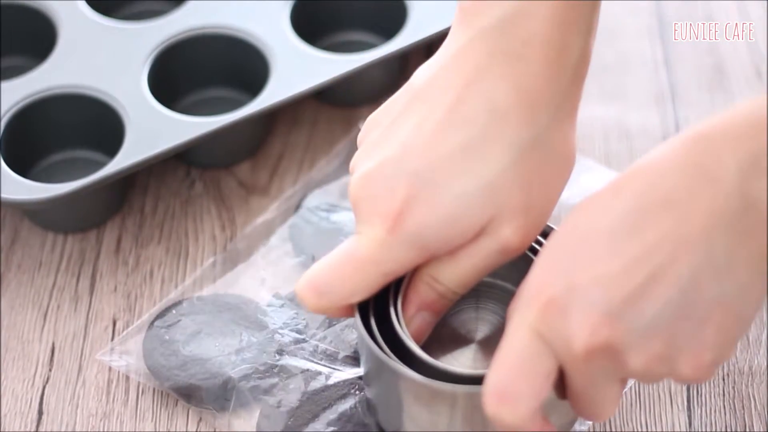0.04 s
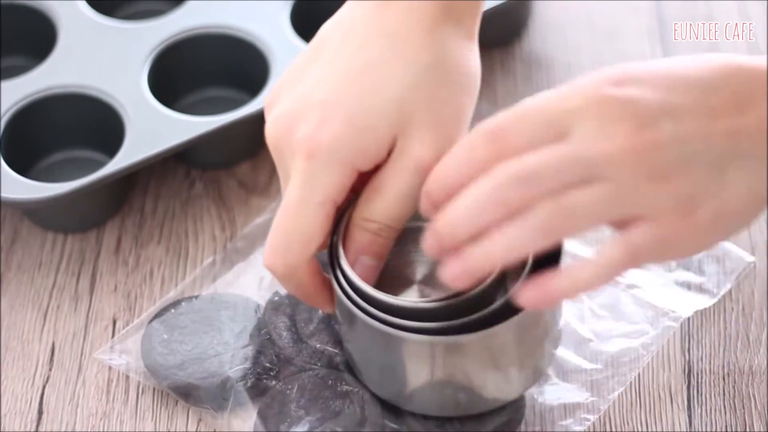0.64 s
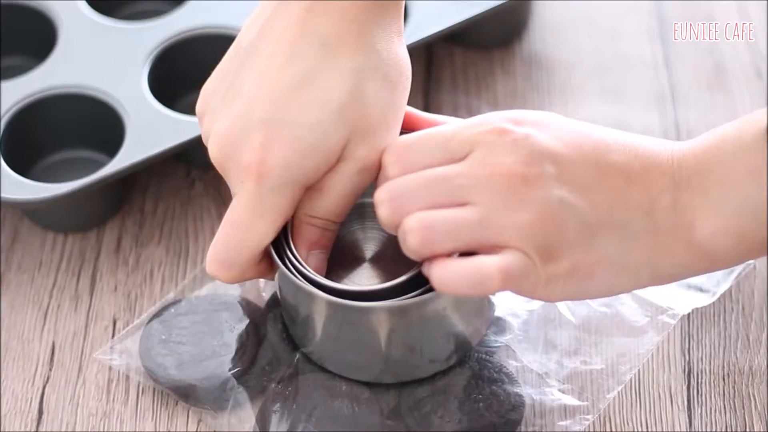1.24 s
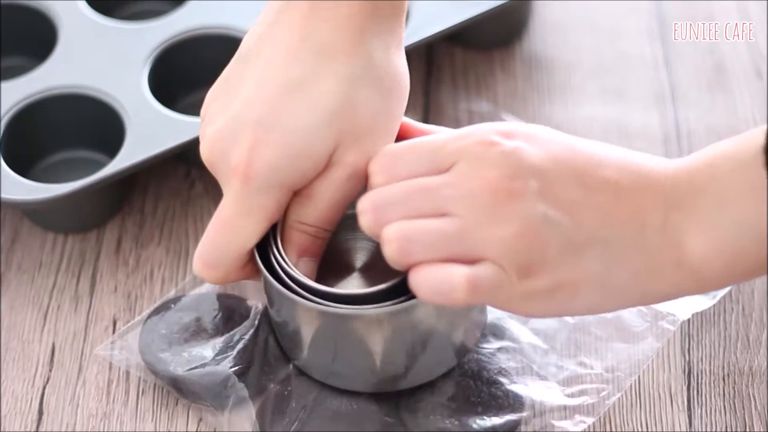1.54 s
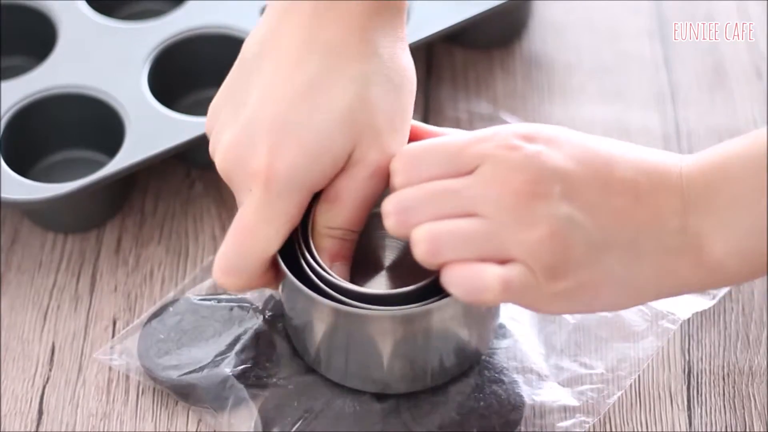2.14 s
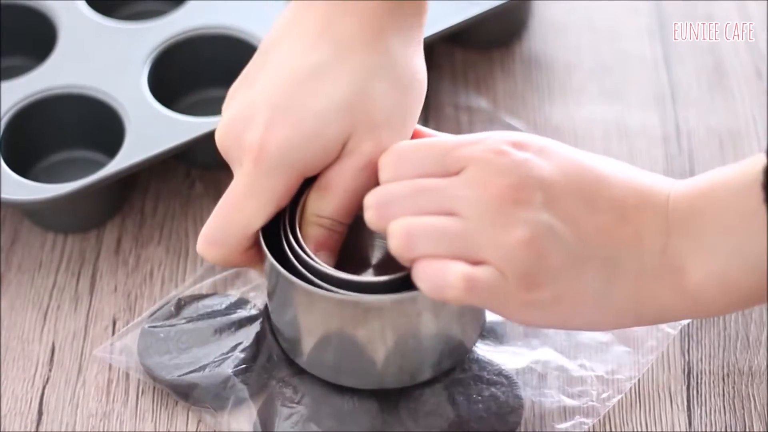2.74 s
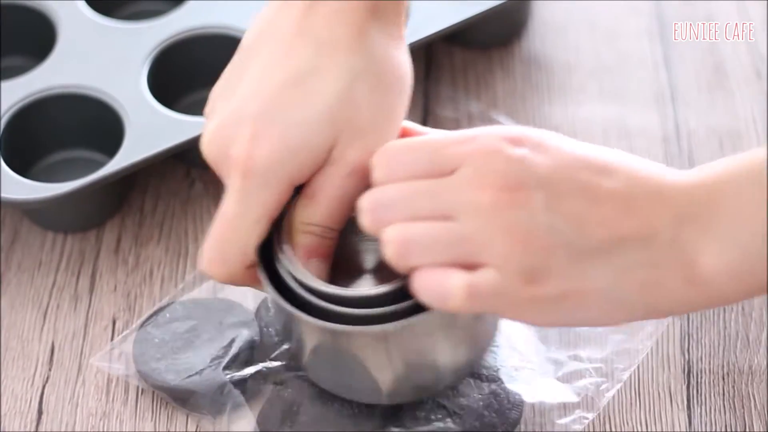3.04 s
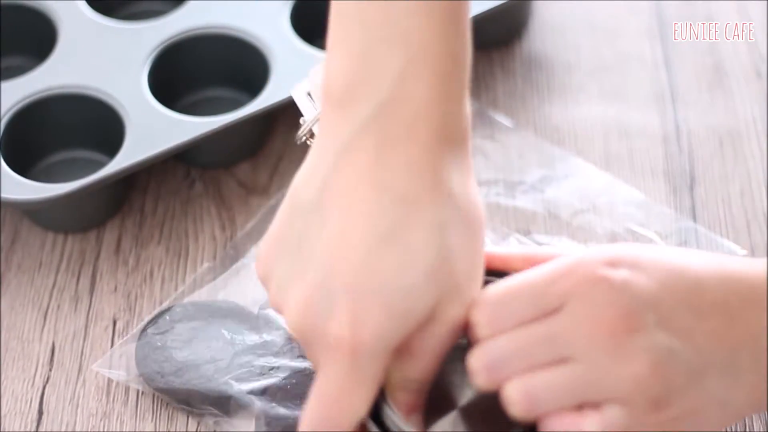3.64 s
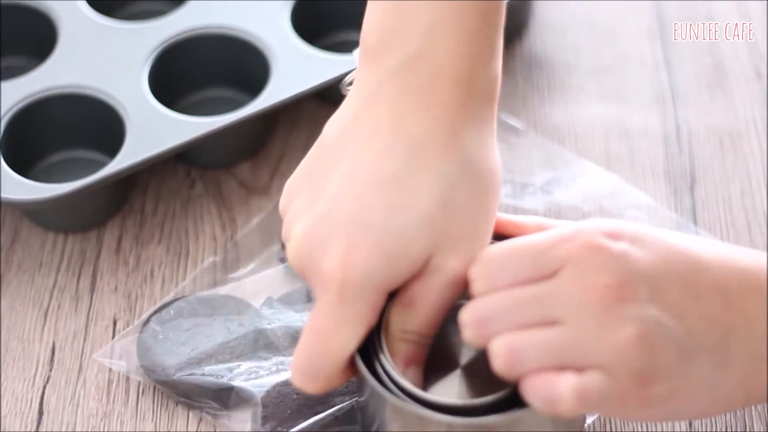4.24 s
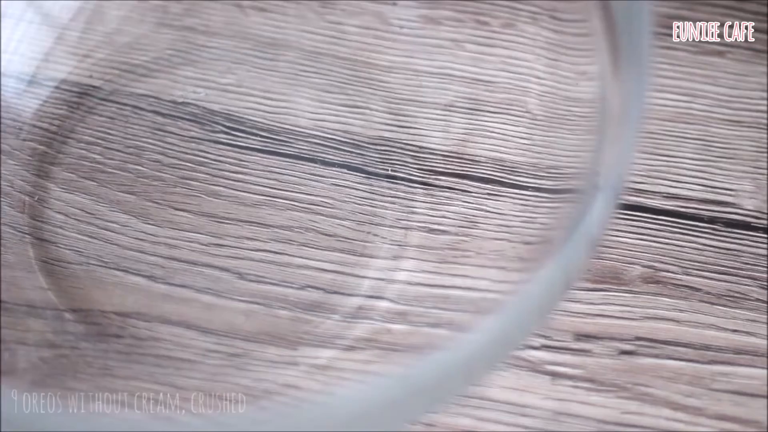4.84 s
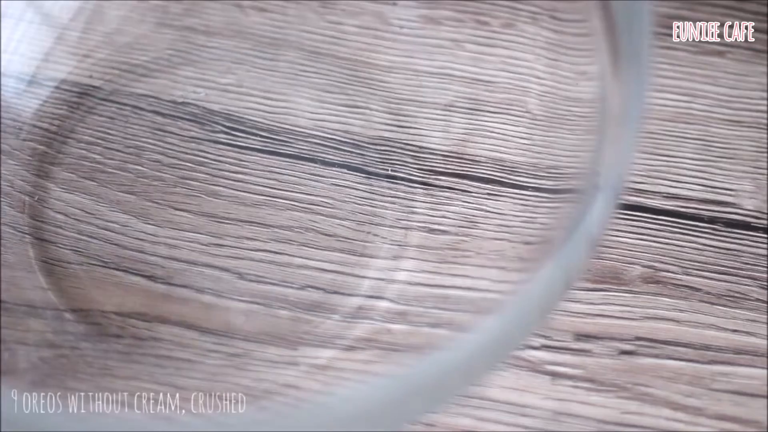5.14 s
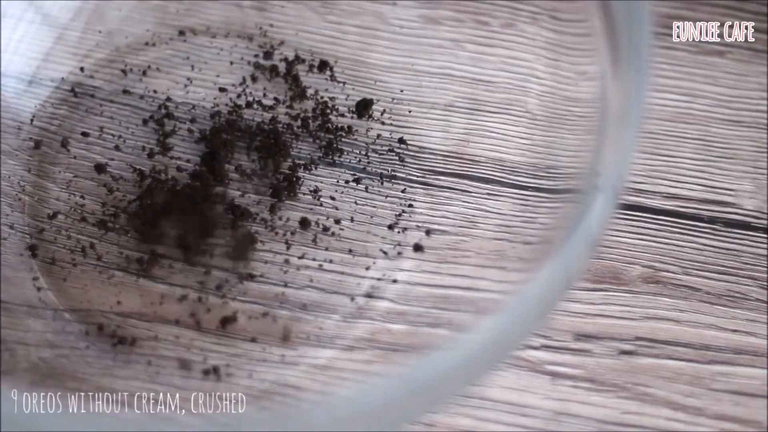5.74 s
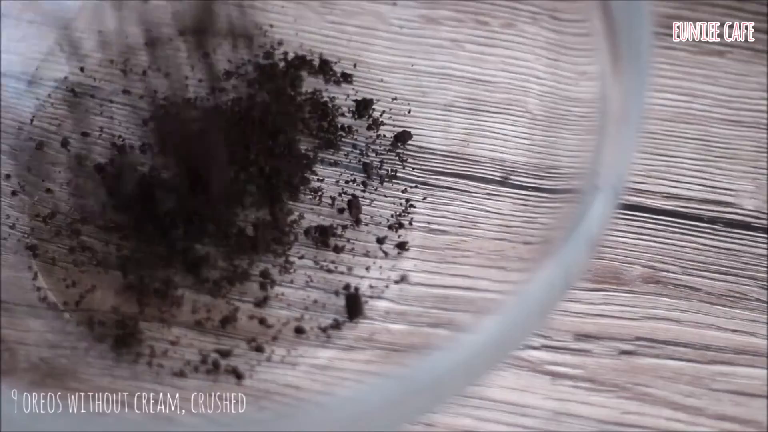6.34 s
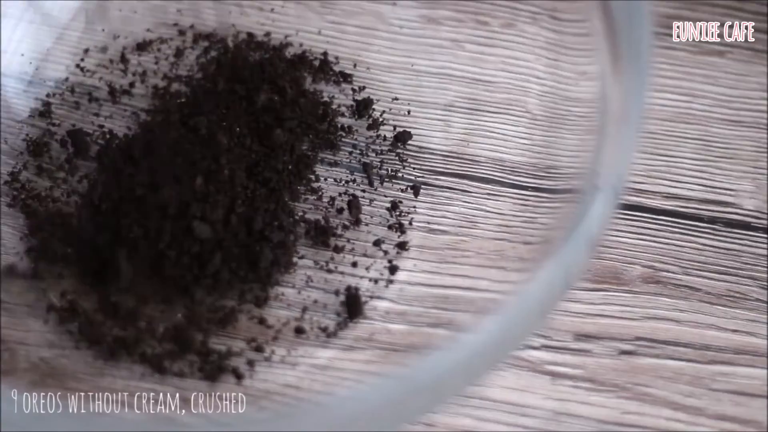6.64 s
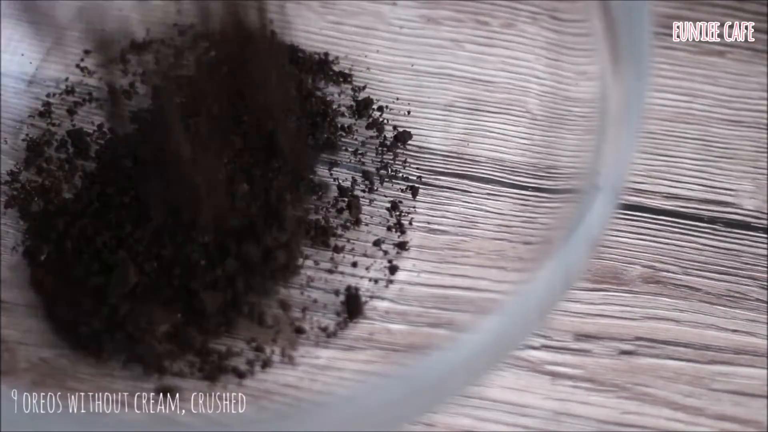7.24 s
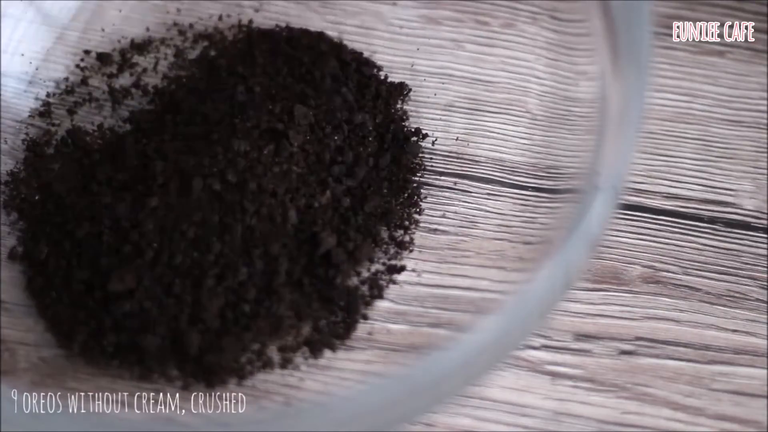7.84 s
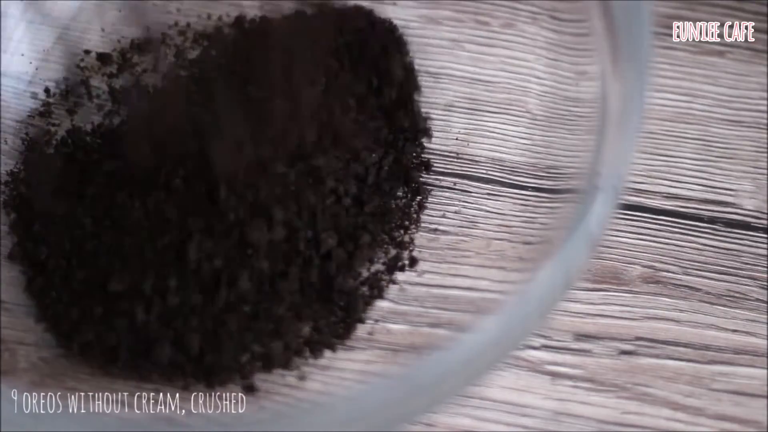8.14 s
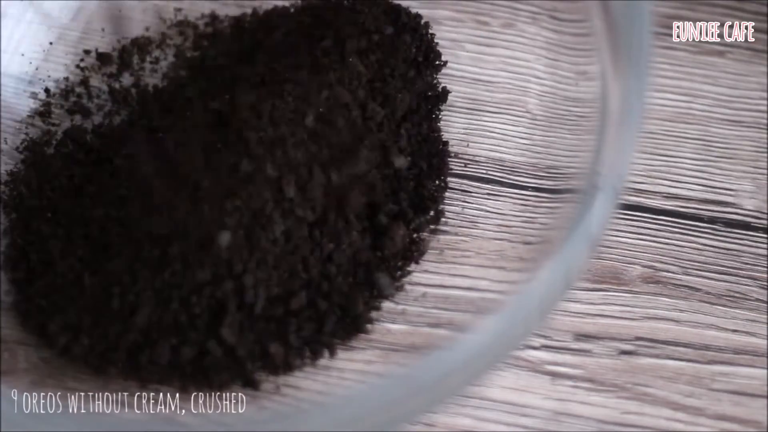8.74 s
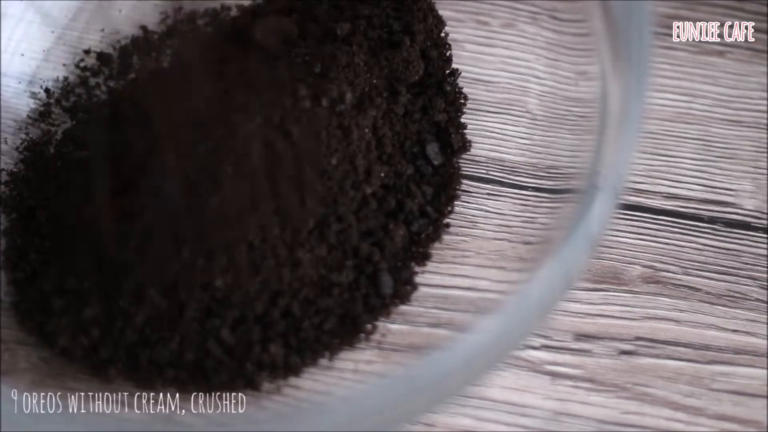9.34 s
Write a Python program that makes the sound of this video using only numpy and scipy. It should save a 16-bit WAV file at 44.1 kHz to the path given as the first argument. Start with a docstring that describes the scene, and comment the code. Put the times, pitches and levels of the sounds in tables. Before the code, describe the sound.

Close up in a quiet kitchen, cookies snap and crunch inside a faintly rustling plastic bag as stacked metal cups bear down, clinking and bumping on a wooden table. The strongest crunches and a loud clank come about halfway. An abrupt change brings a quieter sound: dry crumbs slide from a dish and tinkle into a glass bowl, dulling to a soft patter as they pile up over a faint, low room noise.

```python
"""Crushing cookies and pouring the crumbs

Nested steel cups press on cookies in a plastic bag on a wooden table: the cookies fail by brittle
fracture, the table thuds, the cups rattle and scrape. After an abrupt change of scene, crumbs slide
out of a dish and patter into a glass bowl, whose ring dies as the heap grows. A kitchen murmurs behind."""
import sys
import numpy as np
from scipy import signal
from scipy.fft import rfft, irfft
from scipy.io import wavfile
from scipy.ndimage import uniform_filter1d

SR = 44100
rng = np.random.default_rng(int(sys.argv[2]) if len(sys.argv) > 2 else 0)


def store_pcm(level_fs):
    """Save levels as 16-bit WAV."""
    pcm = np.round(np.clip(level_fs, -1, 1) * 32767).astype(np.int16)
    wavfile.write(sys.argv[1], SR, np.atleast_2d(pcm).T)


N = 422478
TIME = np.arange(N) / SR
AGE = TIME[:SR // 3]  # seconds since an impact

# Cookies breaking. Each row: start in seconds, snap level in dB, table thud in dB,
# brightness in dB per octave, ring of the piece in Hz.
SNAPS = [(0.0562, -45.5, -62, -3, 880), (1.0986, -45, -42.5, -1, 2370), (1.1978, -51.5, -70, 3.5, 3550),
         (1.324, -48, -50, -1, 1600), (1.346, -37, -43.5, -0.5, 1385), (1.5643, -53, -42.5, 6, 3850),
         (1.5912, -40, -25, -1.5, 2350), (1.607, -38, -53, 1, 2260), (1.6352, -38, -36, -1.5, 796),
         (1.653, -37, -28.5, -7, 780), (1.82, -49.5, -50, 3, 3000), (1.832, -44.5, -58, 0, 2620),
         (2.0122, -43.5, -39.5, -3, 3400), (2.3666, -37.5, -29.5, -5, 3300), (2.399, -31.5, -28, -1, 2270),
         (2.654, -50.5, -38.5, -2, 2260), (2.724, -36.5, -31, -1.5, 2400), (2.8951, -43.5, -58, -4.5, 1424),
         (3.005, -46.5, -45, -1, 3190), (3.3299, -46, -34, -4, 1190), (3.5345, -35, -29.5, -1.5, 2400),
         (3.602, -37.5, -53, -2.5, 2400), (3.61, -38.5, -31.5, 1, 2500), (3.73, -37, -43.5, -2.5, 1500),
         (4.1174, -27, -27.5, -0.5, 2460), (4.157, -35, -37, -5, 1400), (4.2019, -28.5, -33, 0, 2400),
         (4.263, -42, -52, 0.5, 2400)]
# The hands bearing down. Each row: start in seconds, length in seconds, effort in dB.
SQUEEZES = [(0.01, 0.012, -56), (1.0, 0.12, -56), (1.58, 0.012, -47), (2.005, 0.018, -55.5),
            (2.38, 0.042, -42), (2.46, 0.053, -51.5), (2.69, 0.024, -43), (2.83, 0.1, -58),
            (2.99, 0.11, -53), (3.39, 0.049, -54), (3.55, 0.12, -53), (3.755, 0.052, -47),
            (4.04, 0.14, -55.5), (4.145, 0.058, -42), (4.28, 0.066, -58)]
# Faint, short crackles of cookie or bag. Each row: start in seconds, level in dB.
SMALL_CRACKLES = [(0.169, -57), (1.068, -56), (2.77, -57), (3.641, -58), (3.762, -48), (4.058, -53.5)]
# Cups colliding. Each row: start in seconds, level in dB, brightness in dB per octave, favoured Hz.
CUP_KNOCKS = [(0.017, -49, 1, 2400), (0.262, -58, 5.5, 3900), (0.359, -49.5, 1.5, 1600),
              (0.467, -36.5, 2, 1780), (0.494, -34.5, 1, 1530), (0.528, -43.5, 3.5, 1570),
              (0.587, -34.5, 3, 1590), (0.642, -37, 3.5, 1680), (0.679, -41, 0.5, 1490),
              (0.789, -41, 1, 1500), (0.807, -34.5, 2, 1720), (0.967, -47.5, 5, 1520),
              (1.274, -46, 4.5, 3120), (1.687, -43.5, 4, 1980), (1.869, -44.5, 2, 3900),
              (1.902, -48.5, 4.5, 1500), (2.244, -53, -1, 1500), (2.511, -40, 0, 1410),
              (3.065, -41, 5.5, 1500), (3.091, -40.5, 4, 1500), (3.246, -53.5, 5.5, 1500),
              (3.333, -33, -9, 1100), (3.343, -40.5, 7.5, 2380), (3.42, -45.5, 9.5, 2240),
              (3.5, -46, 3.5, 2160), (3.986, -44.5, 5, 2610), (4.2012, -36, 1, 2800),
              (4.585, -37.5, 1.5, 2350), (4.594, -38, 10.5, 1590), (4.619, -23.5, -3, 1560)]
# A rim ringing freely. Each row: start in seconds, level in dB.
RIM_CLINKS = [(2.047, -42.5), (3.887, -39)]
# Steel rubbing on steel. Each row: start in seconds, length in seconds, level in dB.
CUP_SCRAPES = [(0.385, 0.06, -57), (0.445, 0.065, -51), (0.598, 0.038, -43.5), (0.94, 0.14, -57.5),
               (3.39, 0.045, -55), (3.79, 0.026, -46.5), (4.555, 0.03, -62), (4.593, 0.003, -36),
               (4.621, 0.024, -33)]
# The cups set down or rocked on the cookies. Each row: start in seconds, table thud in dB.
TABLE_BUMPS = [(0.422, -46), (0.615, -40.5), (0.864, -46), (1.387, -47.5)]
# Crumbs trickling from the tipped dish. Each row: start in seconds, length in seconds, flow in dB.
POURS = [(5.48, 0.62, -69.5), (6.26, 0.36, -61.5), (6.72, 0.8, -72.5), (7.31, 0.27, -60.5),
         (8.02, 0.52, -68), (8.68, 0.51, -72), (9.37, 0.05, -72.5)]
# Clumps falling apart as they land. Each row: start in seconds, patter in dB, thud in dB.
CLUMPS = [(5.607, -51.5, -61), (5.802, -55.5, -61), (6.435, -56, -59), (6.794, -60.5, -75),
          (7.344, -52, -58), (7.52, -58, -55.5), (8.034, -53, -56.5), (8.195, -53.5, -53.5),
          (8.36, -60, -67), (8.634, -57, -68), (8.7, -57, -61), (9.017, -53.5, -56.5)]
# Larger crumbs hitting glass. Each row: start in seconds, ring in dB, tick in dB.
GLASS_HITS = [(5.4435, -40, -57), (5.4815, -69, -54.5), (5.6007, -40.5, -48), (5.6181, -36, -50),
              (5.7535, -45.5, -52), (5.7753, -44.5, -48.5), (5.8217, -31, -45.5), (5.8815, -46.5, -53.5),
              (5.916, -50, -55), (6.117, -47, -55), (6.2527, -35, -55.5), (6.3235, -40, -49),
              (6.4444, -47, -44), (6.6054, -46.5, -52), (7.3028, -51, -58), (7.3544, -49, -56),
              (7.5183, -47, -60)]
# Larger crumbs hitting the heap. Each row: start in seconds, level in dB.
HEAP_HITS = [(6.838, -60.5), (6.951, -56), (9.1833, -47.5)]
# Envelope of the crumbs sliding in the dish. Each row: time in seconds, level in dB.
SLIDE_LEVELS = [(4.75, -87), (5.4, -78.5), (6.5, -76), (7.75, -75), (7.95, -67.5), (9.58, -70)]
# Normal modes. Each row: frequency in Hz, relative level in dB, time to decay by 60 dB in seconds.
CUP_MODES = [(822, -5.5, 0.093), (1100, -7.5, 0.058), (1500, 1, 0.04), (1560, -9.5, 0.032),
             (1740, -8, 0.025), (1980, -8.5, 0.031), (2400, -3, 0.039), (2834, -6.5, 0.029),
             (3154, -10, 0.035), (3330, -12, 0.035), (3923, -14, 0.061), (4500, -17.5, 0.079),
             (5190, -21, 0.05), (5900, -20.5, 0.034), (8020, -28, 0.063)]
RIM_MODES = [(2270, -10, 0.055), (3870, -18.5, 0.092), (4570, -7.5, 0.061), (7240, -12.5, 0.098),
             (10700, -17.5, 0.055)]
BOWL_BASE_MODES = [(3447, -0.71, 0.037), (3520, 0.86, 0.062)]
BOWL_WALL_MODES = [(5965, 10, 0.015), (8205, 1, 0.08), (9300, 2, 0.031), (9350, 3.5, 0.083),
                   (10360, -2, 0.066), (11560, -4.5, 0.031), (15300, 3, 0.036)]
BOWL_LIP_MODES = [(8700, -8.5, 0.059), (10070, -1, 0.043), (11100, -10, 0.045), (11700, -4.5, .04),
                  (12800, -6, 0.05), (13700, -1, 0.037), (15200, -5, .03)]
DISH_MODES = [(2426, -4.5, 0.04), (4266, 1, 0.046), (3740, -4.5, 0.019), (14260, -13, 0.016)]
# Spectral envelopes. Each row: frequency in Hz, relative level in dB.
CRACK_SPECTRUM = [(40, -50.5), (200, -18), (700, -18), (1100, -1.5), (1450, 8), (1850, -6.5), (2400, 6),
                  (2750, -4), (3800, 3.5), (4700, -8.5), (8000, -12.5), (15500, -21.5)]
BAG_SPECTRUM = [(500, -2.5), (2200, -1), (4000, -3), (7600, -11), (12000, -12), (15500, -14)]
WOOD_SPECTRUM = [(40, -47.5), (80, -14.5), (125, 3), (190, 0), (260, 2), (450, -0.5), (530, -0.5),
                 (620, -9), (800, -4), (920, -13), (1040, -8.5), (1800, -29), (5000, -40)]
HEAP_SPECTRUM = [(300, -1), (1500, -19), (3000, 3), (5000, -5.5), (9000, -2), (15500, -4.5)]
KITCHEN_SPECTRUM = [(20, -50), (45, -25.5), (161, -11.5), (236, -7), (344, -17.5), (545, -24), (1370, -39),
                    (5430, -45), (16000, -51.5)]


def cookies_in_bag(crunch, handling_db=-68.5):
    """Brittle fracture: cascades of cracks ring the pieces and cups; crumbs grind and the bag crinkles."""
    crack = colour(CRACK_SPECTRUM)
    grinding = grains(750, 1.7) * crunch
    out = undb(-6.5) * shower(grinding, chip, count=14)
    out += undb(-12.5) * shower(grinding, lambda: ring(CUP_MODES, detune=0.025))
    # the light hold between presses keeps the bag rustling
    crinkles = grains(420, 1.9) * waver(14, db=3.5) * np.hypot(crunch, undb(handling_db))
    out += undb(-9.5) * shower(crinkles, lambda: flake(BAG_SPECTRUM), count=10)
    for s, snap_db, _, tilt_db, hz in SNAPS:
        cracks = cascade(0.005, follow_db=21)
        piece = undb(-3.5) * shard(hz, cycles=9.7)
        steel = undb(-14) * ring(CUP_MODES, scatter_db=7, detune=0.021)
        snap = through(cracks, crack) + through(cracks, piece + steel)
        add(out, s, burst(tilted(snap, tilt_db), snap_db))
    for s, db in SMALL_CRACKLES:
        add(out, s, burst(through(cascade(0.004, follow_db=14), flake(BAG_SPECTRUM)), db))
    return out


def shard(hz, cycles):
    """Damped oscillation of a brittle piece, falling to 1/e in the given cycles; unit energy."""
    turns = hz * AGE
    return unit_energy(np.sin(2 * np.pi * turns) * np.exp(-turns / cycles))


def chip(low_hz=973, high_hz=4523):
    """Size sets resonance: a chip crunches and rings briefly at a random pitch."""
    crunch = flake(CRACK_SPECTRUM)
    hz = low_hz * (high_hz / low_hz) ** rng.random()
    return crunch + shard(hz, cycles=7.5)[:len(crunch)]


def crushing_gains(softening_db_per_s=1.5):
    """Loading and failure: crunch and rumble follow the hands' effort and flare fitfully at each break."""
    effort = swells(SQUEEZES, attack_s=0.025, release_s=0.04)
    yield_s, shed_s = 0.003, 0.026  # a cookie gives way just before it snaps, then sheds crumbs
    shedding = swells([(s, 0, db - 9) for s, db, _, _, _ in SNAPS], yield_s, shed_s)
    settling = swells([(s, 0, db - 14.5) for s, _, db, _, _ in SNAPS], yield_s, shed_s)
    firmness = undb(4.5 - softening_db_per_s * TIME)  # finer crumbs pass less force to the table
    crunch = np.hypot(effort, shedding) * waver(110, db=3)
    rumble = np.hypot(effort * firmness, settling) * waver(110, db=7.5)
    return crunch, rumble


def cups(build_s=0.0016):
    """Impact and friction excite the modes of the hand-damped cups; twice a rim rings free."""
    pressure = swells(CUP_SCRAPES, attack_s=0.003, release_s=0.008)
    rubbing = grains(730, 2.8) * pressure * waver(110, db=2.5)
    contact = colour(CRACK_SPECTRUM)
    out = shower(rubbing, lambda: ring(CUP_MODES, detune=0.025), count=6)
    out += undb(-7.5) * through(rubbing, contact)
    for s, db, tilt_db, hz in CUP_KNOCKS:
        skid = chatter(build_s, fade_s=0.0071)  # the cups skid before they ring fully
        modes = favoured(CUP_MODES, hz)
        clank = ring(modes, scatter_db=0.5, detune=0.008) * np.minimum(AGE / build_s, 1)
        neighbours = ring(modes, detune=0.043) + ring(modes, detune=0.04)
        rattle = undb(-4.5) * through(skid, neighbours) + undb(-12) * through(skid, contact)
        add(out, s, burst(tilted(clank + rattle, tilt_db), db))
    for s, db in RIM_CLINKS:
        rim = ring(RIM_MODES, scatter_db=1.5)
        tick = through(cascade(0.0028, follow_db=18.5), colour(BAG_SPECTRUM))
        add(out, s, burst(rim + undb(-2) * tick, db))
    return butterworth(out, 780, "high", order=6)  # small cups radiate no bass


def chatter(build_s, fade_s):
    """Sliding friction of steel: a run of contacts that builds up and dies; unit energy."""
    envelope = np.minimum(AGE / build_s, 1) * np.exp(-np.maximum(AGE - build_s, 0) / fade_s)
    return unit_energy(grains(5000, 2.654, size=len(AGE)) * envelope)


def table(rumble, deep_from_s=3.3, deep_to_s=3.6, deep_db=5):
    """Forced vibration of wood: the cups drop at each break or bump and rumble on the crumbs."""
    wood = colour(WOOD_SPECTRUM)
    out = through(grains(1200, 3.4) * rumble, wood)
    for s, _, thud_db, _, _ in SNAPS:
        add(out, s, burst(through(cascade(0.012, follow_db=8), wood), thud_db))
    for s, thud_db in TABLE_BUMPS:
        add(out, s, burst(through(cascade(0.01, follow_db=2.5), wood), thud_db))
    # for a while the cups sit on a deeper-sounding part of the table
    on_deep_spot = 1. * ((TIME > deep_from_s) & (TIME < deep_to_s))
    depth = undb(deep_db * uniform_filter1d(on_deep_spot, SR // 20))
    low = signal.sosfiltfilt(signal.butter(2, 230, fs=SR, output="sos"), out)
    return low * depth + (out - low) / depth


def pouring(covering_from_s=6.21, covering_db_per_s=8.5):
    """Granular impacts excite the bowl's modes, ever more weakly as the heap covers the glass."""
    trickle = swells(POURS, attack_s=0.043, release_s=0.24)
    attack_s, release_s = 0.0086, 0.022
    clumps = swells([(s, 0, db) for s, db, _ in CLUMPS], attack_s, release_s)
    thuds = swells([(s, 0, db) for s, _, db in CLUMPS], attack_s, release_s)
    heaping_s = np.maximum(TIME - covering_from_s, 0)
    bare = undb(-4.5 - covering_db_per_s * heaping_s)
    landings = grains(1400, 3) * np.hypot(trickle, clumps) * waver(45, db=8.5)
    on_heap = landings * (undb(2.5) - undb(5.5) * np.sqrt(bare))
    out = shower(on_heap, lambda: flake(HEAP_SPECTRUM), count=8)
    coarse = grains(60, 2.7) * trickle
    out += undb(-2) * shower(coarse, lambda: flake(HEAP_SPECTRUM))
    # the heap takes each clump with a soft thud, and the trickle too as it deepens
    weight = np.hypot(thuds, undb(-7) * heaping_s * trickle)
    soft_thud = colour([(40, -28), (120, -1), (520, 7.5), (1000, -7.5), (3000, -16.5)])
    out += through(grains(2200, 2.4) * weight, soft_thud)
    # the base is covered first, then the wall; the lip catches the spray and dulls last
    on_base, on_wall = landings * bare, landings * bare ** .7
    out += undb(11.5) * shower(on_base, lambda: ring(BOWL_BASE_MODES, 3, detune=0.0059), count=8)
    out += undb(3.5) * shower(on_wall, lambda: ring(BOWL_WALL_MODES, 1, detune=0.0064), count=7)
    on_lip = grains(550, 2.8) * np.hypot(undb(-0.5) * trickle, clumps) * bare ** .15
    return out + shower(on_lip, lambda: ring(BOWL_LIP_MODES, detune=0.0032), count=8)


def lumps(rise_s=0.00083, dish_tap_s=7.231):
    """Single impacts: larger crumbs ping on the glass, nudge the dish or tick dully on the heap."""
    out = np.zeros(N)
    rise = np.minimum(AGE / rise_s, 1)  # a crumb is soft, so the ring builds gradually
    for s, ring_db, tick_db in GLASS_HITS:
        tick = through(cascade(0.007, follow_db=35), colour(HEAP_SPECTRUM))
        contacts = cascade(0.0078, follow_db=0)
        base = ring(BOWL_BASE_MODES, scatter_db=4.5, detune=0.002) * rise
        add(out, s, burst(through(contacts, base), ring_db))
        sides = ring(BOWL_WALL_MODES + BOWL_LIP_MODES, detune=0.002)
        add(out, s, burst(sides + undb(-3) * tick, tick_db))
    dish_tap = ring(favoured(DISH_MODES, pitch_hz=4300), scatter_db=10)
    add(out, dish_tap_s, burst(dish_tap, db=-54.5))
    out = butterworth(out, 2000, "high", order=4)  # crumbs are too light to make any bass
    for s, db in HEAP_HITS:
        tick = through(cascade(0.0032, follow_db=6), flake(HEAP_SPECTRUM))
        add(out, s, burst(tilted(tick, db_per_octave=-3.5), db))
    return out


def dish():
    """Sliding friction: the tiny contacts of moving crumbs excite the modes of the dish."""
    flow = undb(np.interp(TIME, *np.transpose(SLIDE_LEVELS)))
    contacts = grains(700, 7.6) * flow * waver(28, db=2)
    return shower(contacts, lambda: ring(DISH_MODES, scatter_db=3.5, detune=0.012), count=8)


def room(x, wet_db, low_t60, high_t60, absorb_hz):
    """Reverberation: walls answer after 5 ms and absorb the top; two bands decay at their own rates."""
    noise = rng.standard_normal(len(AGE)) * (AGE > .005)
    low = butterworth(noise, 1200, "low", order=2) * decay(low_t60)
    high = butterworth(noise, 1200, "high", order=2) * decay(high_t60)
    tail = butterworth(unit_energy(low - high), absorb_hz, "low", order=4)
    return x + undb(wet_db) * through(x, tail)


def kitchen(level_db=-61):
    """Ambient noise: a steady murmur, strongest in the bass."""
    return through(rng.standard_normal(N), colour(KITCHEN_SPECTRUM, size=8192)) * undb(level_db)


def ring(modes, scatter_db=5, detune=0):
    """Modal superposition, of unit energy: each point of contact weights and loads the modes anew."""
    hz, db, t60 = np.transpose(modes)[:, :, None]
    hz = hz * (1 + detune * rng.standard_normal(hz.shape))
    weight = undb(db + scatter_db * rng.standard_normal(hz.shape)) * rng.choice([-1, 1], hz.shape)
    return unit_energy(np.sum(weight * np.sin(2 * np.pi * hz * AGE) * decay(t60), axis=0))


def favoured(modes, pitch_hz, boost_db=13.5, octaves=0.11):
    """Selective excitation: a point of contact favours the modes near one pitch."""
    return [(hz, db + boost_db * np.exp(-(np.log2(hz / pitch_hz) / octaves) ** 2), t60)
            for hz, db, t60 in modes]


def tilted(x, db_per_octave):
    """Spectral tilt about 2 kHz: harder contacts are brighter."""
    size = 2 * len(x)
    octaves = np.log2(np.clip(np.fft.rfftfreq(size, 1 / SR), 500, 8000) / 2000)
    return irfft(rfft(x, size) * undb(db_per_octave * octaves), size)[:len(x)]


def flake(spectrum):
    """Broadband transient: one tiny crunch, about a millisecond long; unit energy."""
    age = AGE[:SR // 100]
    noise = rng.standard_normal(len(age)) * np.exp(-age * 1000)
    return unit_energy(np.convolve(noise, colour(spectrum)))


def grains(per_s, spread_db, size=N):
    """A Poisson process of tiny impacts, many weak and a few strong; rms 1."""
    strength = undb(spread_db * np.minimum(rng.exponential(size=size), 3))
    impacts = (rng.random(size) < per_s / SR) * strength * rng.choice([-1, 1], size)
    return impacts / np.sqrt(np.mean(impacts ** 2))


def cascade(fade_s, follow_db):
    """Impulse train of unit energy: one contact, then a dying run with follow_db of relative energy."""
    run = grains(4000, 4.9, size=len(AGE)) * np.exp(-AGE / fade_s)
    run = undb(follow_db) * unit_energy(run)
    run[0] = 1
    return unit_energy(run)


def shower(impacts, strike, count=4):
    """Superposition over several points of contact; strike() gives the impulse response of one."""
    spot = rng.integers(count, size=N)
    return sum(through(impacts * (spot == k), strike()[:SR // 16]) for k in range(count))


def swells(rows, attack_s, release_s):
    """Incoherent sum of gains that rise, hold and fall. Each row: start and length in seconds, dB."""
    power = np.zeros(N)
    for s, length, db in rows:
        start = max(s - .25, 0)
        age = TIME[:2 * SR] + start - s
        fade = np.maximum(-age / attack_s, 0) + np.maximum((age - length) / release_s, 0)
        add(power, start, (undb(db) * np.exp(-np.minimum(fade, 20))) ** 2)
    return np.sqrt(power)


def waver(per_s, db):
    """Random amplitude modulation: a gain that rises by up to db and dips somewhat further."""
    knots = rng.uniform(-1.71, 1, N // 100)
    return undb(db * np.interp(TIME * per_s, np.arange(len(knots)), knots))


def colour(spectrum, size=2048):
    """Minimum-phase response of unit energy with the given spectral envelope."""
    hz, db = np.transpose(spectrum)
    bin_hz = np.arange(size // 2 + 1) * SR / size
    log_gain = np.log(undb(np.interp(np.log(bin_hz + 1), np.log(hz), db)))
    cepstrum = irfft(log_gain)
    cepstrum[1:size // 2] *= 2  # folding the cepstrum makes the response causal
    cepstrum[size // 2 + 1:] = 0
    return unit_energy(irfft(np.exp(rfft(cepstrum))))


def through(x, response):
    """Convolution with an impulse response."""
    return signal.oaconvolve(x.astype(np.float32), response.astype(np.float32))[:len(x)].astype(float)


def butterworth(x, hz, kind, order):
    """Maximally flat low-pass or high-pass filtering."""
    return signal.sosfilt(signal.butter(order, hz, kind, fs=SR, output="sos"), x)


def decay(t60):
    """Exponential decay by 60 dB in t60 seconds."""
    return np.exp(-np.log(1000) * AGE / t60)


def burst(x, db):
    """Short-time rms scaling: the loudest 4 ms of a blow take this level."""
    return x * undb(db) / np.sqrt(uniform_filter1d(x ** 2, SR // 250, mode="constant").max())


def unit_energy(x):
    """Normalisation to a sum of squares of 1."""
    return x / np.linalg.norm(x)


def undb(db):
    """Decibels to amplitude ratio."""
    return 10 ** (np.asarray(db) / 20)


def add(out, s, x):
    """Superposition of x on out from s seconds on."""
    start = max(int(s * SR), 0)
    out[start:start + len(x)] += x[:N - start]


def scene(change_s=4.64):
    """Two reverberant scenes, crushing then pouring, joined by a 4 ms crossfade over the kitchen noise."""
    crunch, rumble = crushing_gains()
    walls = dict(wet_db=-12.5, low_t60=0.38, high_t60=0.62, absorb_hz=5200)
    crushing = room(cookies_in_bag(crunch) + table(rumble), **walls) + room(cups(), **walls)
    crumbs = pouring() + dish() + lumps()
    filling = room(crumbs, wet_db=-14, low_t60=0.23, high_t60=0.21, absorb_hz=11950)
    after = np.clip((TIME - change_s) / .004 + .5, 0, 1)
    return (crushing * (1 - after) + filling * after + kitchen())[None]


def record(dry):
    """Band limiting: a steep low-pass filter removes the treble above 16 kHz."""
    return signal.sosfilt(signal.ellip(10, .1, 80, 16000, fs=SR, output="sos"), dry)


dry = scene()
out = record(dry)
store_pcm(out)
```